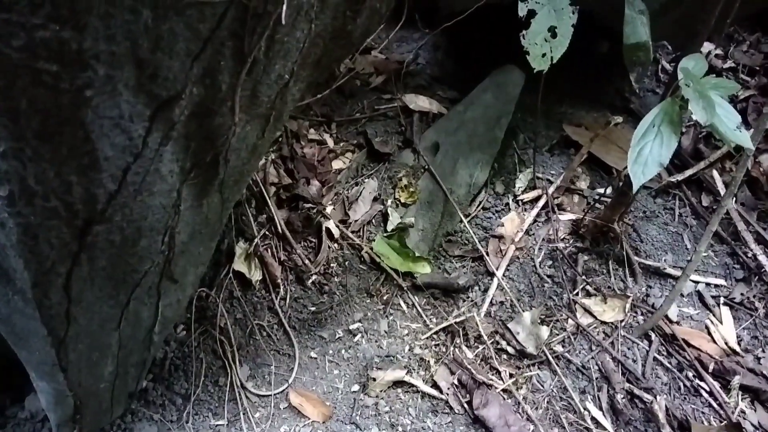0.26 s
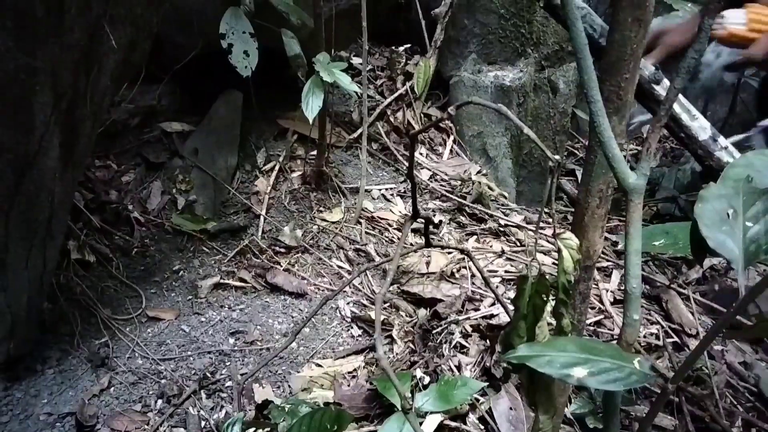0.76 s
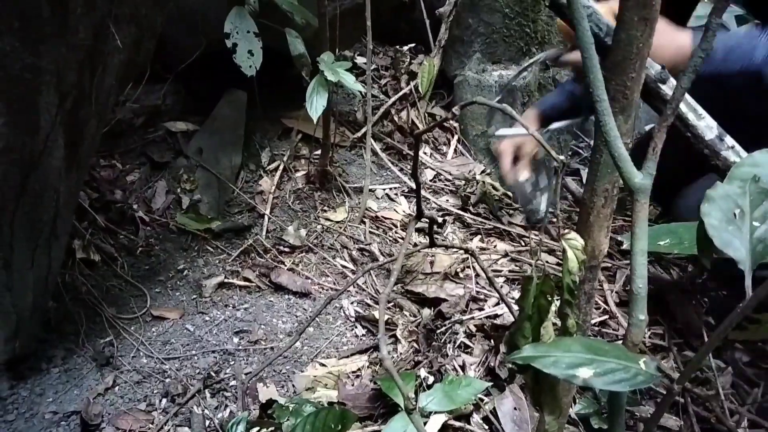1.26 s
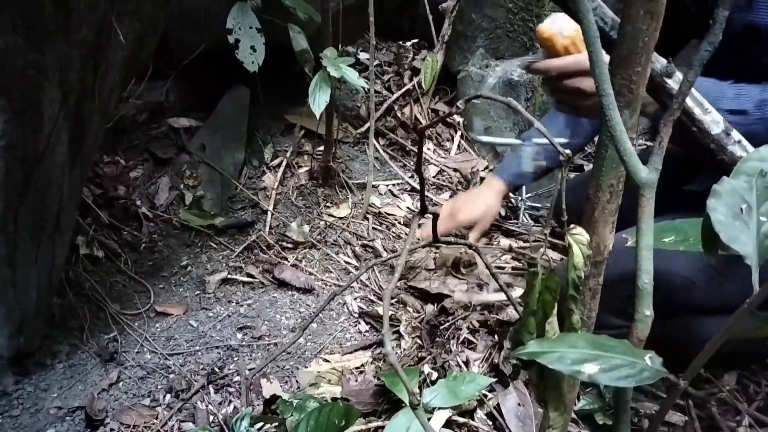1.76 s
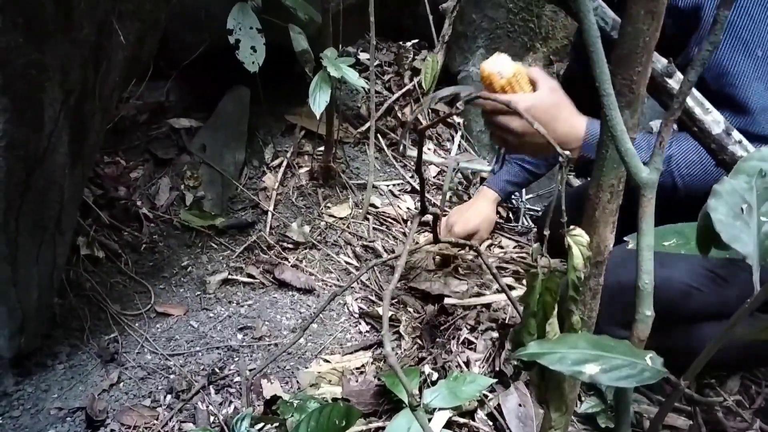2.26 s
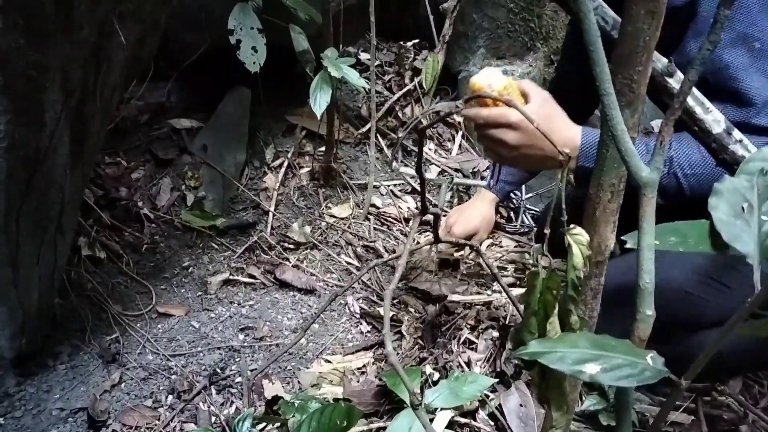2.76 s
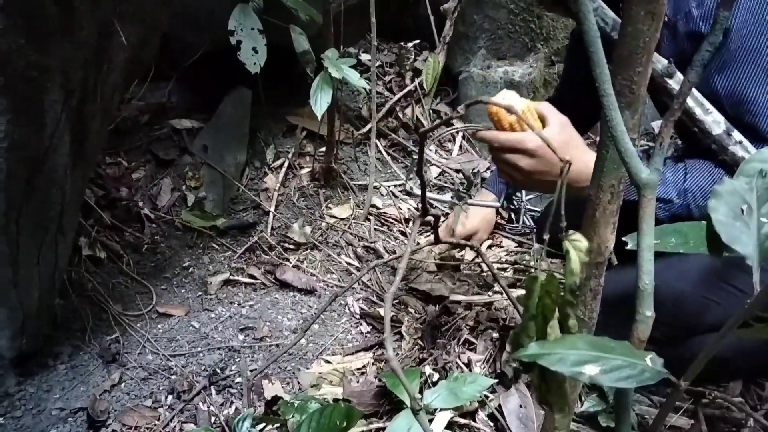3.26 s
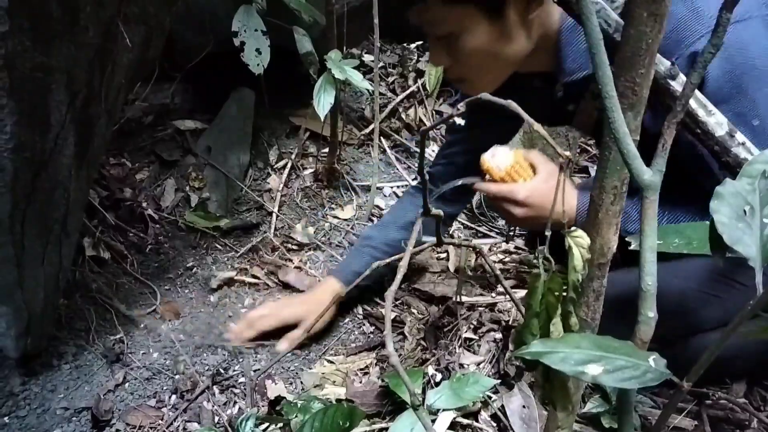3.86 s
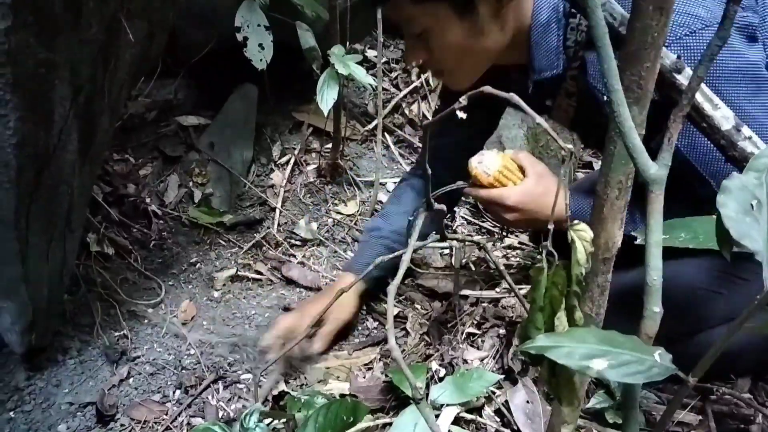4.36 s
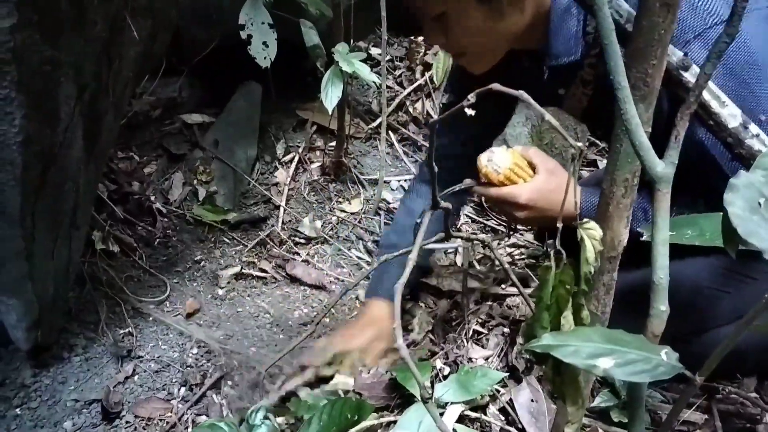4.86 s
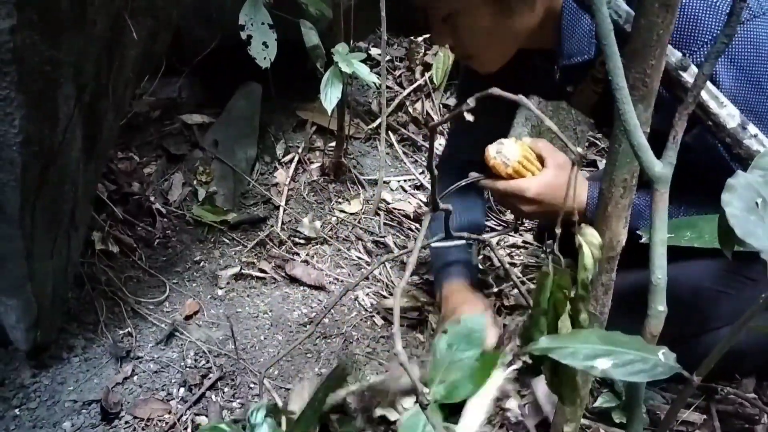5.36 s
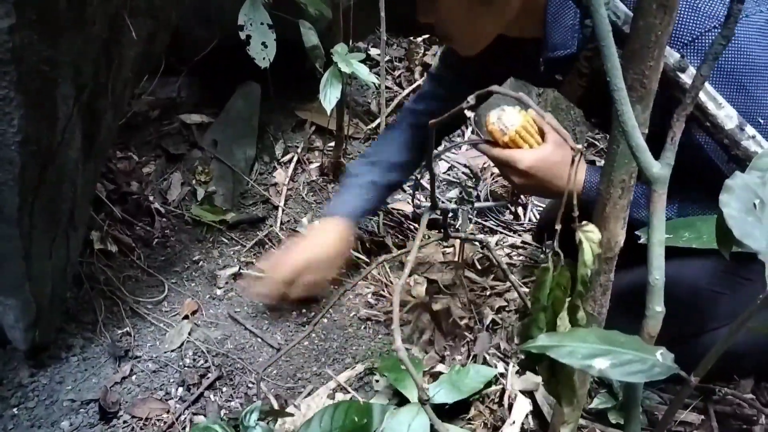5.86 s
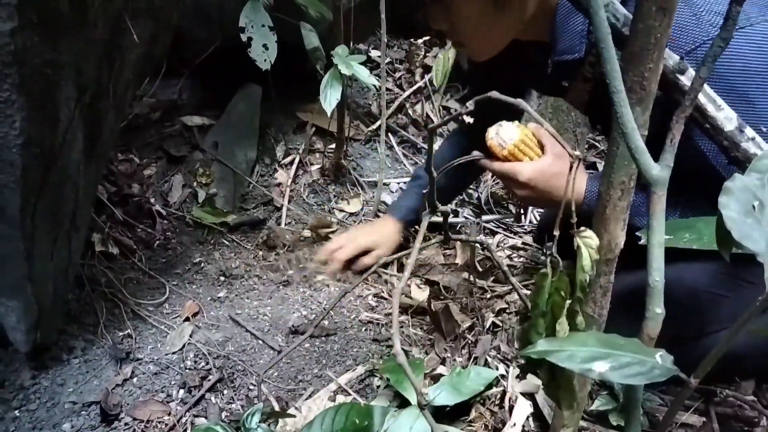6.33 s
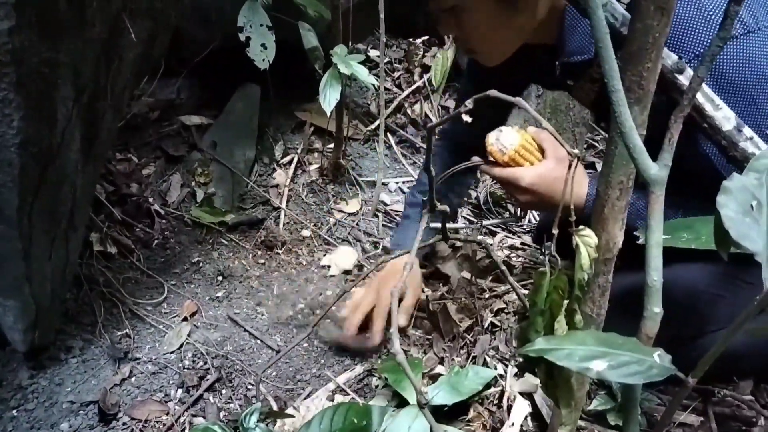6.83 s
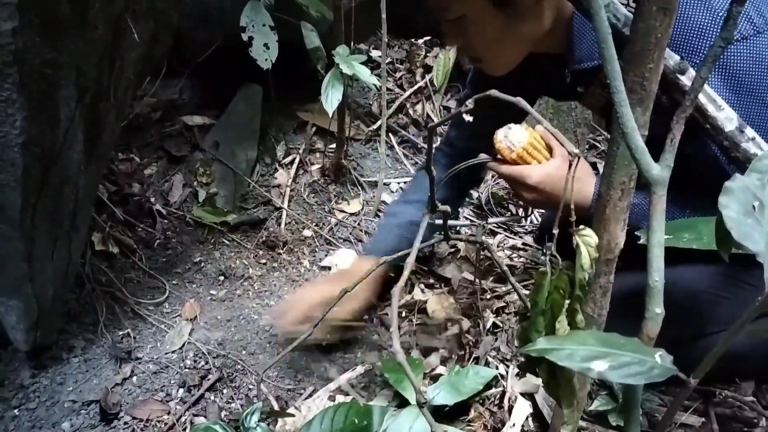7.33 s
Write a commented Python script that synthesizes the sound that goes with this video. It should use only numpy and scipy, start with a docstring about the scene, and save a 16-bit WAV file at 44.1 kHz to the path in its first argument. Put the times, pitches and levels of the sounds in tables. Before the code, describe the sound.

A faint forest hiss with a light rub and a small creaky click on the camera drops out briefly, then fades back in. A hand rustles through dry leaves, twigs snapping in sharp bright cracks, loudest around the first third. After a calmer moment it sweeps bare soil in separate gritty rasps with low soft thuds. Close, dry outdoor sound from a camera on the spot.

```python
"""A hand stirs leaf litter, snaps dry twigs, then sweeps bare soil in rasping strokes: short puffs of noise
over a smooth hiss, with cracks, small rings, squeaks and low thuds of packed ground.
The place is a quiet forest floor, the forest a far hiss; the microphone sits in a camera on the spot.
A finger rubs the camera body and a creaking button switches it off; it starts again, fading in smoothly
with small sudden gain changes down and up. Each start leaves a slowly settling offset in the amplifier."""
import sys
import numpy as np
from scipy import signal
from scipy.fft import rfft, irfft
from scipy.io import wavfile
from scipy.ndimage import uniform_filter1d

SR = 44100
rng = np.random.default_rng(int(sys.argv[2]) if len(sys.argv) > 2 else 0)


def master_out(mix):
    """Clip the mix to full scale and print it as 16-bit PCM to the path in sys.argv[1]."""
    frames = np.transpose(np.atleast_2d(mix))
    ceiling = np.clip(frames, -1, 1)
    pcm = np.round(ceiling * 32767).astype(np.int16)
    wavfile.write(sys.argv[1], SR, pcm)


N = 334719
T = np.arange(N) / SR
STOP_S, START_S = .5118, .6

# Far forest hiss, relative spectrum: (frequency [Hz], density [dB per Hz])
FOREST_COLOUR = [(70, -45), (170, 3), (1200, -2.5), (2600, 1), (4000, -6), (5600, -12), (6900, -5.5),
                 (8400, -16.5), (15300, -16), (15750, -35)]
# Before the stop: (time [s], forest level [dB], treble of the finger rub relative to it [dB])
FOREST_AND_FINGER = [(0, -70.5, -18), (.22, -69.5, -18), (.36, -64.5, -24), (.384, -68, -21),
                     (.39, -64, -3), (.448, -63, -1), (.456, -65, -4), (.498, -66, -3), (.51, -69, -5)]
QUIET_DB = -78  # forest hiss after the restart
# Air and handling on the camera body: (time [s], level [dB])
RUMBLE = [(0, -56), (.04, -69.5), (.1, -83), (.38, -65.5), (.49, -73), (.59, -54), (.7, -58), (.76, -74),
          (.82, -68), (1.08, -74.5), (1.16, -67.5), (2.45, -74.5), (2.52, -62), (2.6, -75), (3.55, -81.5),
          (5.5, -75.5), (7.59, -82)]
# The camera body flexes: (time [s], peak [dB], start frequency [Hz], length [s])
PUSHES = [(.34, -52.5, 125, 0.017), (.443, -53.5, 125, .068), (0.884, -61, 120, .025),
          (1.168, -58, 181, .016), (1.402, -61, 170, .018)]
# Creaks of the button: (time [s], level before colouring [dB])
BUTTON_CREAKS = [(.39, -32), (.3953, -44), (.4008, -43), (.4101, -48)]
# Colour of a creak: (frequency [Hz], gain [dB])
CREAK_COLOUR = [(400, -25), (2000, -4), (15300, -4), (15800, -25)]

# Offset of each start: (reference time [s], level at that time [dB], time constant [s])
OFFSETS = [(0, -37, 0.46), (.84, -30, 0.56)]
# Smooth fade-in after the restart, before the sudden changes: (time [s], gain [dB])
FADE_IN = [(.6, -50), (.64, -32), (.66, -16), (.68, -8.5), (.705, -3.5), (.77, .2), (.84, 1.8)]
# Small sudden lasting gain changes, down and up: (time [s], change [dB])
GAIN_STEPS = [(.7054, -2), (.7253, 1), (.7654, -1.8), (.7854, 1)]
EDGE_HZ = 16575  # upper band limit

# The palm thuds on packed ground: (time [s], level [dB], hold [s])
THUDS = [(.7, -67, 0), (1.27, -75, 0), (1.6, -81, .2), (2.046, -71, .1), (2.34, -79, 0.0097),
         (2.51, -65, 0.023), (2.94, -75, 0.023), (3.67, -80, 0), (3.943, -65.5, 0.039),
         (4.31, -63.5, 0.0082), (4.438, -78, .03), (4.64, -75, 0), (4.893, -66.5, 0.11),
         (5.284, -68.5, 0.048), (5.695, -70, 0.023), (6.198, -74, 0.00035), (6.37, -72, .02),
         (6.51, -83, 0), (6.858, -69, 0.074), (7.195, -71, 0.078), (7.58, -74, 0)]
THUD_RISE_S, THUD_FALL_S = .045, 0.1  # time to span SLOPE_DB
GROUND_HZ, GROUND_WIDTH_HZ = 210.5, 88
GROUND_HUM_DB, GROUND_FOLLOWS = -82, 0.48  # hum at a rustle of -64.5 dB; dB per dB of rustle

# Short coloured rubs and squeaks:
# (time [s], length [s], start frequency [Hz], end frequency [Hz], width [Hz], level before fading the ends [dB])
RUBS = [(0.214, 0.067, 2060, 1990, 18, -71.5), (0.282, 0.062, 2000, 2020, 80, -75),
        (1.061, 0.022, 944, 890, 590, -62), (1.16, .08, 1165, 1120, 82, -74),
        (1.266, 0.036, 1183, 1203, 170, -57), (1.27, 0.024, 1640, 1670, 210, -57),
        (1.313, 0.025, 2050, 2060, 170, -59), (1.318, .025, 1180, 1210, 120, -62.5),
        (3.613, 0.019, 3720, 3680, 180, -63.5), (3.687, 0.029, 2970, 3030, 150, -62.5),
        (6.171, 0.25, 1748, 1560, 280, -65.5), (6.417, 0.15, 1297, 1146, 220, -64.5)]
# Something small and hard is struck: (time [s], level [dB])
TINKS = [(1.422, -31.5), (1.4556, -43)]
# Modes of a tink: (frequency [Hz], relative level [dB], decay by 60 dB [s])
TINK_MODES = [(8750, -8, 0.027), (9162, -4, 0.016), (10520, 4, 0.0082), (11220, -3.5, 0.049)]

# Twigs and leaf stalks that snap: (time [s], level before halving [dB], treble [dB], mids [dB],
# ring frequency [Hz], ring boost, at most 16 in use [dB], crack time constant [s])
SNAPS = [(.7736, -48, -3, 5, 11200, 15, .0005), (.974, -47.5, -19, -3, 2970, 17, .00057),
         (1.0233, -43, -7, -2, 3790, 5, .001), (1.2123, -39.5, -11, -1, 7620, 8, 0.00048),
         (1.2847, -34, -8, 3, 5300, 4, 0.00035), (1.3248, -43, -9, 7, 2110, 4, .0017),
         (1.3814, -39, -6, 15, 2950, 14, .00084), (1.421, -33.5, 2, 0, 11280, 12, .0017),
         (1.5262, -33.5, -5, 4, 3880, 5, 0.00039), (1.607, -37, -2, -7, 3490, 6, .0011),
         (1.6394, -33.5, -5, -14, 3240, 10, .00063), (1.6475, -35, 15, 0, 10030, 8, .00054),
         (1.755, -42, 5, -5, 10500, 14, .0017), (1.845, -38, -6, 16, 7800, 12, 0.00089),
         (1.875, -37, -1, 7, 4050, 6, 0.0009), (1.9053, -31.5, -12, -10, 7540, 15, 0.00094),
         (1.926, -33.5, 7, 3, 3790, 16, 0.00057), (2.0253, -39.5, -7, 8, 4050, 5, .00088),
         (2.079, -40.5, 10, -4, 14860, 6, .0007), (2.097, -24, -6, 6.5, 7240, 0, 0.00065),
         (2.1325, -32, 12, -8, 10120, 3, 0.00069), (2.1403, -13, 4.5, 7, 4300, 13.5, 0.00075),
         (2.1444, -26, -9, 13.5, 7580, 1, 0.0014), (2.1622, -21, -3.5, 5.5, 7750, 8, 0.00089),
         (2.183, -37, -4, -4, 7670, 7, .0009), (2.1976, -35, -4, 7, 4390, 10, .0012),
         (2.2043, -32.5, -2, 7, 4610, 10, .00062), (2.255, -34, -11, 1, 3170, 5, 0.00099),
         (2.279, -36, -5, -12, 3530, 5, .00035), (2.3286, -33, -10, 6.5, 1370, 9.5, 0.0044),
         (2.342, -34, -8, -13, 4130, 4, .0006), (2.3525, -19, 2.5, -5, 9650, 0.5, 0.0012),
         (2.389, -42, -6, -5, 4090, 8, .0007), (2.4567, -12, -4.5, 2.5, 12700, 3, 0.0017),
         (2.4619, -28.5, -14, 3, 6800, 1, .0011), (2.5026, -18.5, -3.5, 5, 7580, 5, 0.0009),
         (2.505, -27, -5, 10, 3790, 3, .0013), (2.5256, -8.5, 0.5, 0, 7100, 4, .0008),
         (2.556, -31.5, -9, 3.5, 14640, 7, .0015), (2.607, -46, -2, -5, 4440, 13, .0013),
         (2.6576, -41, 7, 5, 7580, 12, .0006), (2.6957, -45, -8, 5, 2110, 16, .00089),
         (2.733, -46, 0, 2, 9090, 7, .0008), (2.8322, -44.5, -8, 2, 4350, 8, .0012),
         (2.8484, -39.5, -15, -1, 2800, 9, 0.00064), (2.9649, -42, 17, 6, 10680, 4, .0011),
         (2.9798, -26, -2.5, 2, 8200, 8, 0.00079), (3.2255, -48, 5, 2, 5120, 16, .0009),
         (3.3304, -45.5, -5, 0, 9260, 3, .0005), (3.4554, -46, -15, -7, 6100, 10, 0.001),
         (3.6554, -44, -7, 12.5, 600, 16, .00093), (3.8215, -43.5, 5, 4, 4050, 7, .0005),
         (4.073, -51.5, -7, 4, 5400, 16, .0028), (4.1054, -54.5, -8, 0, 4420, 10, .00088),
         (4.2536, -43.5, -15, -14, 4040, 9, .00056), (4.579, -42, 1, -9, 4300, 16, 0.0028),
         (4.738, -49, 12, 12, 4180, 16, .0007), (4.7634, -47.5, 16, 5, 7620, 3, .0006),
         (4.9012, -40.5, -6, -13, 4160, 7, .0015), (4.9676, -30, -9, 5, 4270, 13, .0015),
         (5.273, -31, -11, -12, 4270, 16, 0.0023), (5.373, -29.5, 8, -2, 11200, 9, .0011),
         (5.3879, -31, 10, 2, 10000, 13, 0.00034), (5.6302, -38, -23, -6, 4140, 8, .001),
         (5.7004, -34, 4, -0.5, 10000, 13, .00053), (5.973, -47, -13, -6, 4310, 15, .0015),
         (6.07, -44, -4.5, 6, 5160, 15, 0.0049), (6.127, -42.5, -12.5, -11, 6900, 16.5, 0.001),
         (6.2488, -37.5, -13, -11, 4010, 17, 0.0021), (6.2787, -36.5, -4, -5, 4010, 11, .0012),
         (6.4991, -32.5, -21, -13, 11500, 16, .0009), (6.5234, -39, -10, 0, 3830, 10, .0007),
         (6.554, -31, 3, 3.5, 4130, 14, 0.0024), (7.1283, -46.5, 6, 18.5, 9300, 10, 0.00068),
         (7.1621, -48.5, -9, .5, 3960, 10, .0008), (7.297, -39.5, -12, -1, 10940, 12, 0.0027),
         (7.3806, -42.5, -8, 4, 5700, 16, .001), (7.4695, -50.5, -8, -3, 5200, 16, .00066),
         (7.5328, -41.5, -2, -10, 6740, 11, 0.00065)]
# Relative colour of a snap: (frequency [Hz], density [dB per Hz])
CRACK_COLOUR = [(70, -43), (200, -13), (450, -25.5), (900, -14), (1400, -18.5), (2400, -20), (3700, -4),
                (5200, -18.5), (7400, 1), (10300, -5), (12000, -4), (15300, -4.5), (15750, -30),
                (16500, -30)]
SNAP_T60_S, TAIL_S_PER_DB = 0.041, .0006  # tail of a snap at -32.5 dB; s of tail gained per dB
# Small breaks at a rustle of -65 dB; dB per dB of rustle; random spread
CRACKLE_DB, CRACKLE_FOLLOWS, CRACKLE_SPREAD_DB = -44.5, 0.44, 1.5

# Moves of the hand through the litter: (full-strength start [s], rustle [dB], rise [s], hold [s],
# fall [s], treble of dry leaves [dB], mids of dragged soil [dB])
STROKES = [(0.653, -71.5, 0.38, 0, 0.39, 0, 6), (0.787, -72.5, 0.18, 0.014, .2, -3, 1),
           (.912, -60, 0.08, 0.0071, 0.09, -1, 3), (1.038, -66, 0.11, 0.0077, 0.36, -1.5, 0),
           (1.18, -64, 0.068, 0, .4, -3, 2.5), (1.28, -55.5, 0.1, 0, .16, -1.5, 1),
           (1.41, -61.5, 0.2, 0.13, .2, 0.5, -3.5), (1.628, -56.5, 0.11, 0.011, .15, -1, -1),
           (1.737, -66, .2, 0.017, .05, 0, 1), (1.826, -58.5, 0.067, 0.01, 0.13, 3, 3),
           (1.944, -52, 0.061, 0.0088, 0.094, -2, -1), (2.013, -64.5, .2, 0.056, 0.34, 0, 2),
           (2.157, -48, 0.037, 0.0028, .09, 0, -2), (2.27, -58, 0.094, 0, 0.056, 1.5, 3),
           (2.345, -57.5, 0.029, 0.02, 0.1, -4, 2), (2.465, -51, 0.095, 0, 0.073, 1.5, -3),
           (2.521, -56, 0.06, 0.02, 0.11, 3.5, -3.5), (2.625, -68, .2, 0.091, 0.13, -0.5, 3),
           (2.868, -60.5, 0.096, 0.01, 0.4, 1, 0.5), (3.137, -72.5, .3, 0.071, 0.2, 1.5, 2.5),
           (3.553, -71.5, 1, 0.0069, 0.36, 0.5, -1), (3.716, -63, 0.079, 0.022, 0.2, -2, -1.5),
           (3.937, -69.5, 0.35, 0.015, 0.25, -0.5, -0.5), (4.234, -66, 0.081, 0, 0.33, -3, -1.5),
           (4.362, -70.5, 0.26, 0.024, .04, -3, 1), (4.46, -65.5, 0.085, 0.16, 0.22, -0.5, -1),
           (4.664, -59, 0.05, 0, 0.06, -1.5, -2.5), (4.75, -73, 0.11, 0, .1, -2, -4),
           (4.921, -55, 0.088, 0.087, 0.22, -2.5, -1.5), (5.106, -67.5, 0.14, 0.044, 0.1, -2.5, -2),
           (5.294, -46.5, 0.049, 0.17, 0.32, -4.5, -4), (5.733, -52.5, 0.083, 0.084, 0.2, 0, -3.5),
           (6.13, -61.5, 0.09, 0.0023, 0.16, 0, -3), (6.235, -54, .15, 0, 0.23, -1.5, -7),
           (6.403, -54, 0.22, .12, .15, -0.5, -5), (6.578, -58.5, .1, .03, 0.06, -1.5, -10),
           (6.74, -69.5, .2, 0.0055, .3, -1, -4), (6.877, -56.5, 0.14, 0.0067, .18, -1, -3.5),
           (7.178, -71.5, .08, 0.12, .2, 4, 1.5), (7.314, -56.5, 0.083, 0, 0.21, 0, -4.5),
           (7.55, -73, 0.21, 0.014, 0.13, -2, -1)]
SLOPE_DB, SETTLE_DB = 21, -83  # span of a rise or fall; litter settling between moves
# Spread of grain sizes at a rustle of -60 dB; how many dB it narrows per dB of harder sweeping
GRAINY_DB, SMOOTHING = 2.5, 0.085
# Colour of litter at the microphone: (frequency [Hz], gain on white noise [dB])
LITTER_COLOUR = [(150, -4.5), (350, 3), (800, 5.5), (1500, 4), (2300, 4), (2900, 3.5), (3500, 10.5),
                 (4200, 11.5), (4900, 3), (5600, 2.5), (7200, 9.5), (10500, 7), (12800, 1.5), (15400, 2),
                 (15800, -43)]
# Bare soil against leaves: (frequency [Hz], difference [dB])
SOIL_COLOUR = [(300, -1.5), (450, -2), (900, 0.5), (1600, 2), (2700, -2.5), (4000, 0), (5200, 1.5),
               (7000, -1), (11000, 0.5), (14000, 1.5)]
# The hand moves from leaves to bare soil: (time [s], share of soil [0 to 1])
ON_SOIL = [(3.6, 0), (4.0, 1)]


def gain_of(db):
    """Decibels to a factor."""
    return 10 ** (np.asarray(db) / 20)


def evened(x):
    """Scales to rms 1."""
    return x / np.sqrt(np.mean(x ** 2) + 1e-20)


def read(points, hz):
    """Reads a curve of frequency on a log-frequency axis."""
    f, value = np.transpose(points)
    return np.interp(np.log(hz + 1), np.log(f + 1), value)


def columns(rows, t):
    """Every column of a curve at the times t."""
    s, *cols = np.transpose(rows)
    return [np.interp(t, s, c) for c in cols]


def add(mix, s, sound):
    """Mixes a sound in at time s."""
    part = mix[round(s * SR):][:len(sound)]
    part += sound[:len(part)]


def shares(hz):
    """How much a frequency belongs to the treble and to the mids."""
    treble_share = read([(4800, 0), (6500, 1)], hz)
    mids_share = read([(2200, 1), (3000, 0)], hz)
    return treble_share, mids_share


def coloured(x, points):
    """Filters by a spectrum in dB."""
    hz = np.fft.rfftfreq(len(x), 1 / SR)
    return irfft(rfft(x) * gain_of(read(points, hz)), len(x))


def shaped(x, db_of):
    """Weights short-time spectra by db_of(hz, t)."""
    hz, t, z = signal.stft(x, SR, nperseg=256, noverlap=192)
    weighted = z * gain_of(db_of(hz[:, None], t))
    return signal.istft(weighted, SR, nperseg=256, noverlap=192)[1][:len(x)]


def band(lo_hz, hi_hz, order=2):
    """Noise of rms 1 between two edges."""
    sos = signal.butter(order, [lo_hz, hi_hz], "band", fs=SR, output="sos")
    return evened(signal.sosfilt(sos, rng.standard_normal(N)))


def swells(t, s, db, rise, hold, fall):
    """Power of each event at the times t: a rise, a hold and a fall, straight in dB."""
    s, db, rise, hold, fall = (np.reshape(v, (-1, 1)) for v in (s, db, rise, hold, fall))
    early = (s - t) / np.maximum(rise, .01)
    late = (t - s - abs(hold)) / np.maximum(fall, .01)
    outside = np.maximum(np.maximum(early, late), 0)
    return gain_of(2 * (db - SLOPE_DB * outside))


def forest():
    """Steady noise with the spectrum of the far forest, rms 1."""
    return evened(coloured(rng.standard_normal(N), FOREST_COLOUR))


def rumble():
    """Low noise of air and handling on the camera body, swelling and sinking."""
    return gain_of(columns(RUMBLE, T)[0]) * band(12, 94)


def pushes():
    """One soft low bump of falling pitch for each flex of the camera body."""
    out = np.zeros(N)
    for s, db, hz, length in PUSHES:
        t = np.arange(0, length, 1 / SR)
        bump = np.sin(np.pi * t / length)
        add(out, s, gain_of(db) * bump * np.sin(2 * np.pi * hz * t * (1 - 3.2 * t)))
    return out


def button():
    """The button creaks in clicks of coloured noise that die within a millisecond or two."""
    out, t = np.zeros(N), np.arange(300) / SR
    noise = rng.standard_normal((len(BUTTON_CREAKS), 300))
    for (s, db), n in zip(BUTTON_CREAKS, noise):
        add(out, s, gain_of(db) * coloured(n, CREAK_COLOUR) * np.exp(-t / .0003))
    return out


def before_stop():
    """Forest hiss, the treble noise of a finger rubbing the body, and the button, up to the stop."""
    level, rub = columns(FOREST_AND_FINGER, T)
    finger = gain_of(rub) * band(6500, 15400, order=6)
    return (gain_of(level) * (forest() + finger) + button()) * (T < STOP_S)


def ground():
    """Noise in one low resonance of the packed ground swells with each thud and hums with the rustle."""
    drum = band(GROUND_HZ - GROUND_WIDTH_HZ / 2, GROUND_HZ + GROUND_WIDTH_HZ / 2)
    s, db, hold = np.transpose(THUDS)
    t = T[::64]
    thuds = swells(t, s, db, THUD_RISE_S, hold, THUD_FALL_S).sum(0)
    hum = gain_of(2 * (GROUND_HUM_DB + GROUND_FOLLOWS * (hand(t)[0] + 64.5)))
    return np.interp(T, t, np.sqrt(thuds + hum)) * drum * (T > START_S)


def rubs():
    """Noise in one narrow, slightly gliding resonance for each rub."""
    out = np.zeros(N)
    noise = rng.standard_normal((len(RUBS), 2, SR // 2))
    for (s, length, hz0, hz1, width, db), (a, b) in zip(RUBS, noise):
        n = round(length * SR)
        pole = np.exp(-np.pi * width / SR)
        wander = signal.lfilter([1], [1, -pole], a + 1j * b)[-n:]
        carrier = np.exp(2j * np.pi * np.cumsum(np.linspace(hz0, hz1, n)) / SR)
        tone = (wander * carrier).real
        add(out, s, gain_of(db) * evened(tone) * signal.windows.tukey(n, .6))
    return out


def tinks():
    """A few high modes that ring for some hundredths of a second."""
    out, t = np.zeros(N), np.arange(3000) / SR
    ring = sum(gain_of(db - 60 * t / t60) * np.sin(2 * np.pi * hz * t) for hz, db, t60 in TINK_MODES)
    for s, db in TINKS:
        add(out, s, gain_of(db) * ring * (1 - np.exp(-t / .002)))
    return out


def crackles(count=34):
    """Rows like those of SNAPS for small breaks at random moments, stronger as the hand rustles louder."""
    u, g = rng.random((count, 4)).T, rng.standard_normal((count, 3)).T
    s = START_S + (T[-1] - START_S) * u[0]
    db = CRACKLE_DB + CRACKLE_FOLLOWS * (hand(s)[0] + 65) + CRACKLE_SPREAD_DB * g[0]
    treble, mids = -6 + 6 * g[1], -3 + 6 * g[2]
    ring_hz, ring_db = 2500 * 4.5 ** u[1], 8 + 8 * u[2]
    return list(zip(s, db, treble, mids, ring_hz, ring_db, 0.00045 + .0009 * u[3]))


def snaps(tail_db=-14, ring_width=0.11):
    """Each break is a short crack with the ring of its piece, and a tail scattered by leaves and rock."""
    out, t = np.zeros(N), np.arange(4096) / SR
    hz = np.fft.rfftfreq(4096, 1 / SR)
    hi, lo = shares(hz)
    lo = lo * read([(200, 0), (500, 1)], hz)  # thin wood has no bass to vary
    rows = SNAPS + crackles()
    noise = rng.standard_normal((len(rows), 4096))
    for (s, db, treble, mids, ring_hz, ring_db, crack), n in zip(rows, noise):
        ring = min(ring_db, 16) / (1 + ((hz / ring_hz - 1) / ring_width) ** 2)
        colour = read(CRACK_COLOUR, hz) + hi * treble + lo * mids + ring
        body = irfft(rfft(n) * gain_of(colour))
        t60 = max(SNAP_T60_S + TAIL_S_PER_DB * (db + 32.5), .01)
        shape = np.exp(-t / max(crack, 1e-4)) + gain_of(tail_db - 60 * t / t60)
        shape *= (1 - np.exp(-t / .0003)) ** 2  # soft start
        body /= np.sqrt(np.average(body ** 2, weights=shape ** 2))  # the blow sets the energy
        add(out, s, gain_of(db) * body * shape / shape.max() / 2)
    return out


def hand(t):
    """Rustle level, treble and mids in dB: stroke powers add up, and the louder one sets the colour."""
    *shape, treble, mids = np.transpose(STROKES)
    power = swells(t, *shape)
    total = power.sum(0) + gain_of(2 * SETTLE_DB)
    return 10 * np.log10(total), treble @ power / total, mids @ power / total


def litter_grains(per_s=5000, register_db=9):
    """Crumbs and leaf edges tick densely, a few much louder, each a short puff in its own register."""
    coarse = T[::64]
    grainy = GRAINY_DB - SMOOTHING * (np.interp(T, coarse, hand(coarse)[0]) + 60)
    size_db = np.clip(grainy, 0, 7) * np.minimum(rng.exponential(1, N), 6)
    size = gain_of(size_db) * (rng.random(N) < per_s / SR)
    kind, t, ticks = rng.integers(0, 12, N), np.arange(512) / SR, np.zeros(N)
    centres = np.geomspace(800, 14000, 12)  # Hz
    lengths = rng.permutation(np.geomspace(.0002, .002, 12))  # s, from sand to leaf edges
    for k, (centre, length) in enumerate(zip(centres, lengths)):
        register = [(400, 0), (centre / 1.4, 0), (centre, register_db), (centre * 1.4, 0)]
        decay = np.exp(-t / length) + 0.24 * np.exp(-t / 0.0074)
        puff = coloured(rng.standard_normal(512), register) * decay
        ticks += signal.oaconvolve(size * (kind == k), evened(puff))[:N]
    # graininess does not change the loudness
    return ticks / np.sqrt(uniform_filter1d(ticks ** 2, 9000) + 1e-9)


def litter(bed=0.4, patchy_db=1.2, burst_db=1.2):
    """Grains over the smooth hiss of sliding fine soil take their level and colour from the hand."""
    source = litter_grains() + bed * rng.standard_normal(N)

    def db_of(hz, t):
        """Level and colour of the litter under the hand, with random variation."""
        level, treble, mids = hand(t)
        hi, lo = shares(hz)
        patches = rng.standard_normal((len(t), len(hz))).T
        patches = evened(uniform_filter1d(uniform_filter1d(patches, 14, 0), 18, 1))
        # leaves give way in clumps
        bursts = evened(uniform_filter1d(rng.standard_normal(len(t)), 12))
        # leaves leave a gap that soil fills
        hollow = read([(4700, 0), (5500, 0.63), (6500, 0.19)], hz) * -.8 * (treble + 2)
        soil = columns(ON_SOIL, t)[0] * read(SOIL_COLOUR, hz)
        tilt = hi * treble + lo * mids + hollow + soil
        # the colour below 9 kHz wanders slowly at random
        drift = evened(uniform_filter1d(rng.standard_normal(len(t)), 60))
        wander = 1 + 0.047 * drift * (hz < 9000)
        return read(LITTER_COLOUR, hz * wander) + level + tilt + patchy_db * patches + burst_db * bursts
    return shaped(source, db_of)


def scene():
    """All sources at the microphone, mono."""
    quiet = gain_of(QUIET_DB) * forest()
    after_start = (quiet + tinks() + snaps() + litter()) * (T > START_S)
    return (before_stop() + rumble() + pushes() + ground() + rubs() + after_start)[None]


def settling_offset():
    """After each start the amplifier's negative offset decays exponentially towards zero."""
    (s1, db1, tau1), (s2, db2, tau2) = OFFSETS
    first = gain_of(db1) * np.exp((s1 - T) / tau1)
    second = gain_of(db2) * np.exp((s2 - T) / tau2)
    return -np.where(T < STOP_S, first, second)


def record(dry):
    """Adds the offsets, drops the gain at the stop, fades in with sudden changes and limits the band."""
    restart_db = columns(FADE_IN, T)[0] + sum(db * (T > s) for s, db in GAIN_STEPS)
    gain = np.where(T < STOP_S, 1, gain_of(restart_db))
    taps = signal.firwin(511, EDGE_HZ, window=("kaiser", 9), fs=SR)
    padded = np.pad((dry + settling_offset()) * gain, ((0, 0), (255, 255)), "edge")
    return signal.oaconvolve(padded, taps[None], "valid")


dry = scene()
out = record(dry)
master_out(out)
```